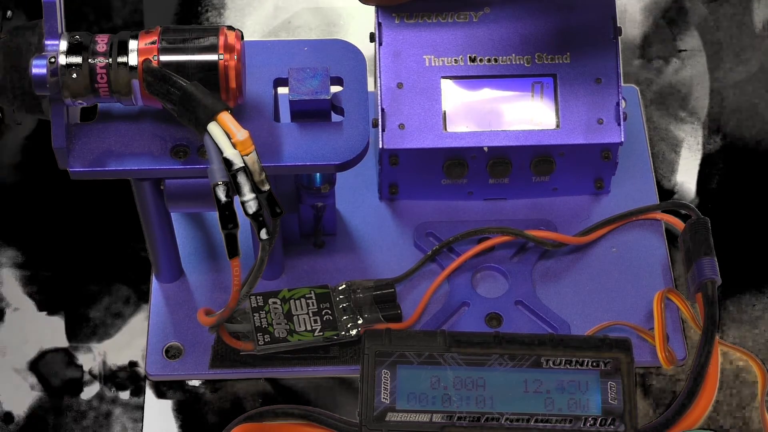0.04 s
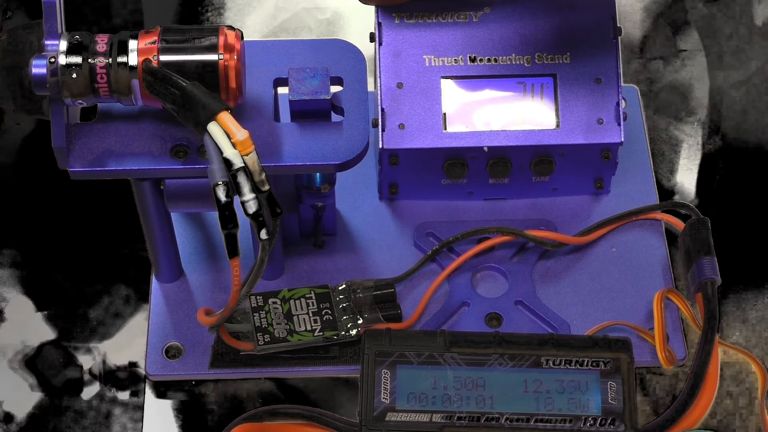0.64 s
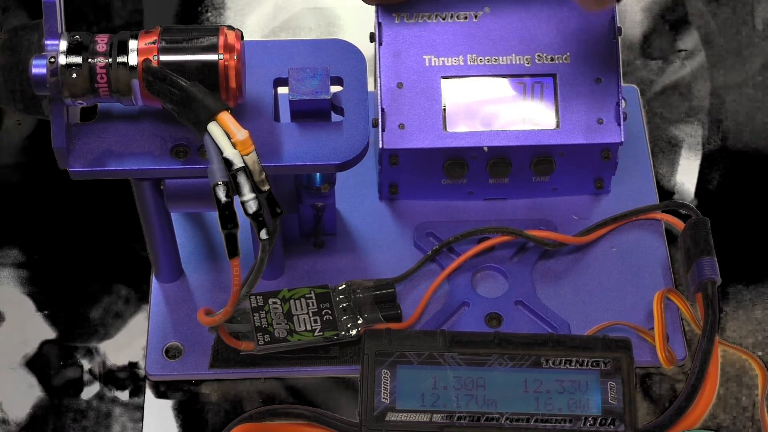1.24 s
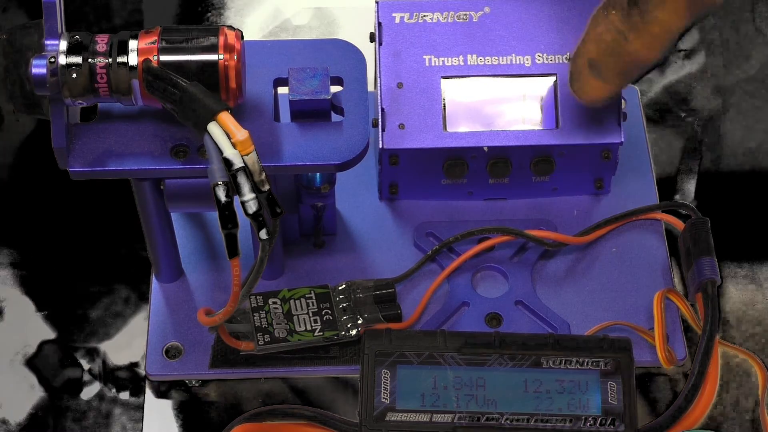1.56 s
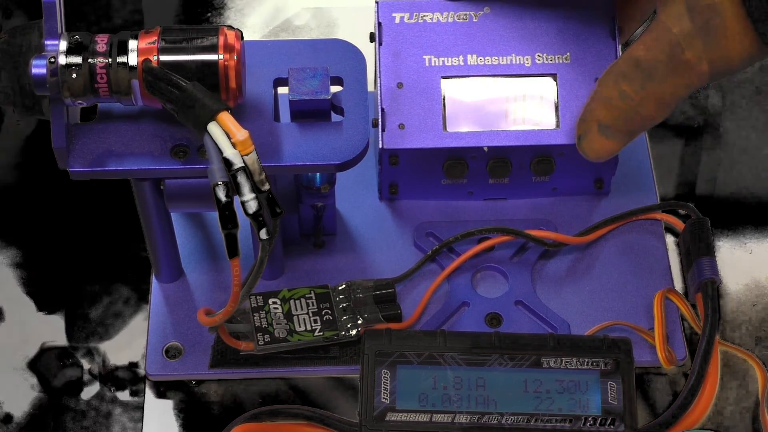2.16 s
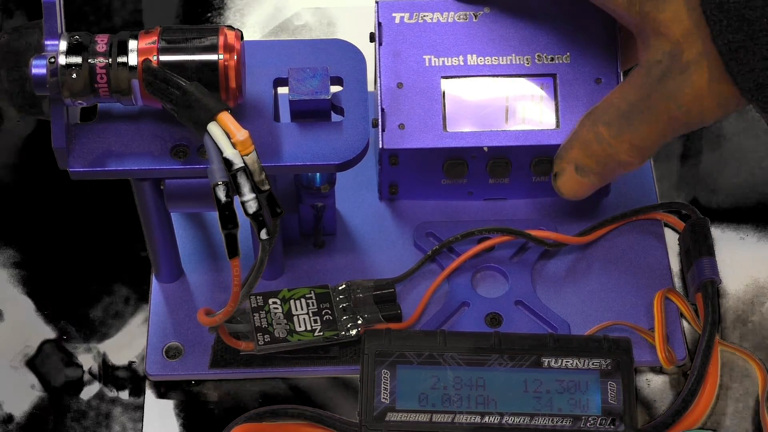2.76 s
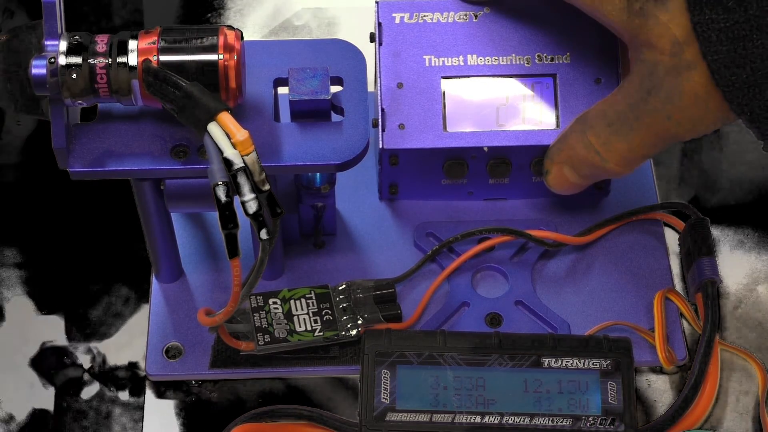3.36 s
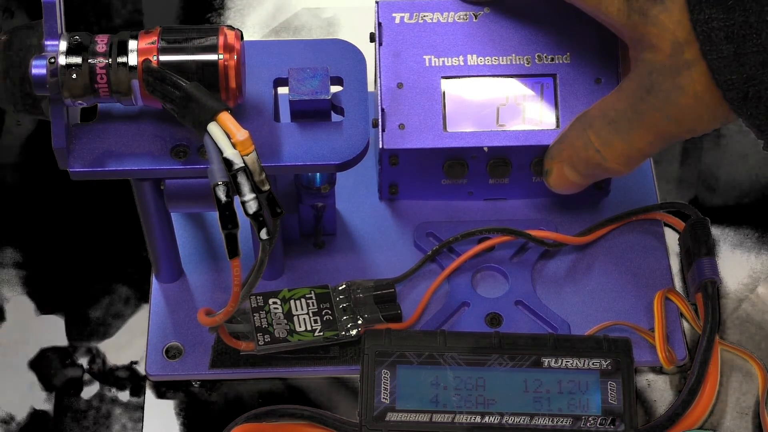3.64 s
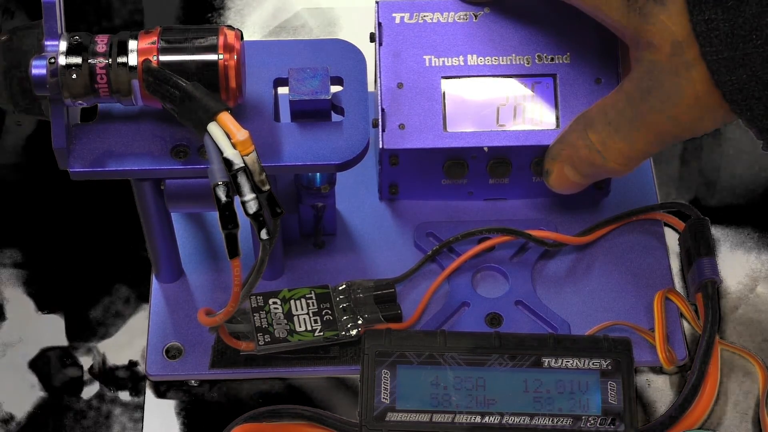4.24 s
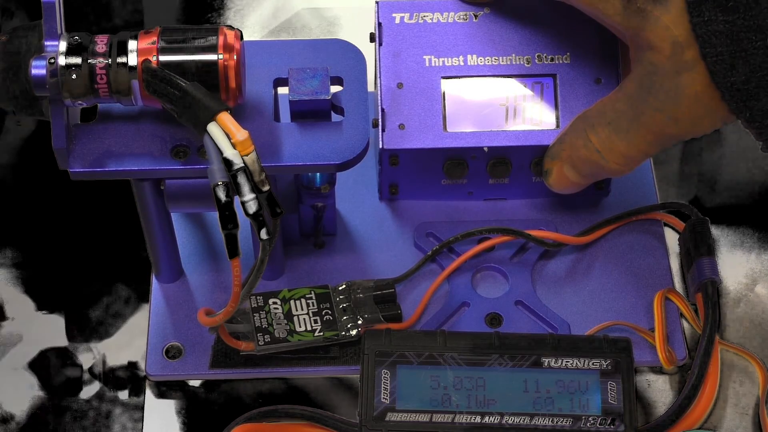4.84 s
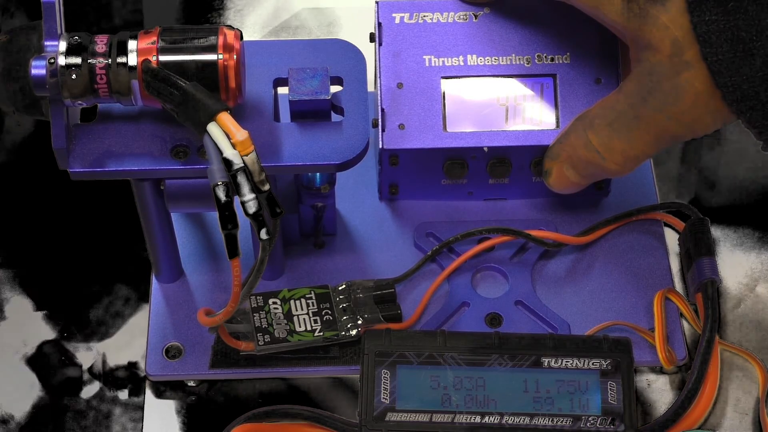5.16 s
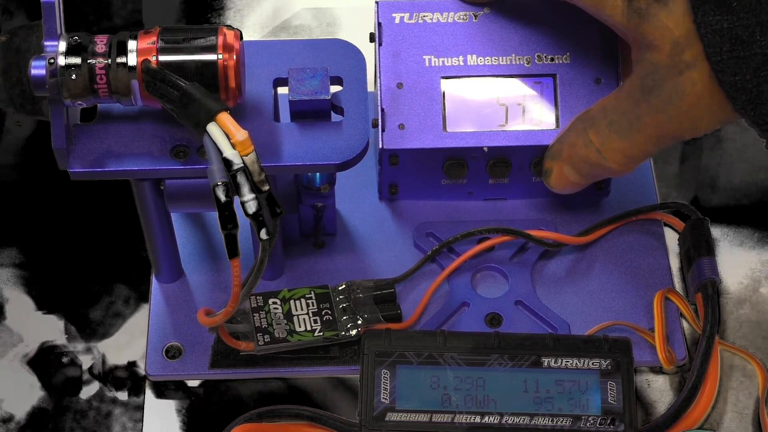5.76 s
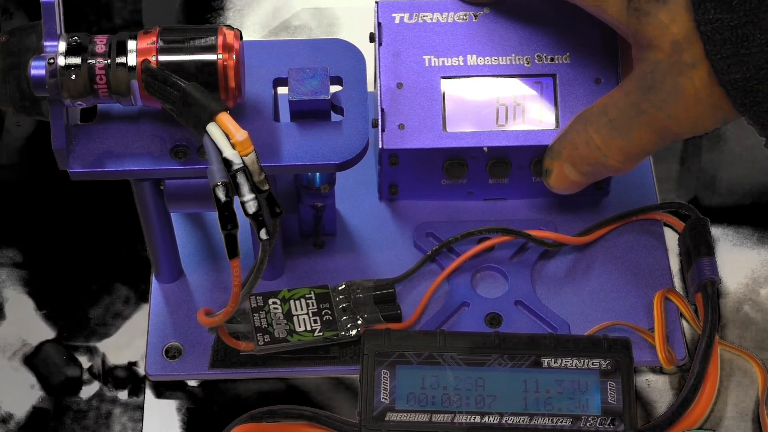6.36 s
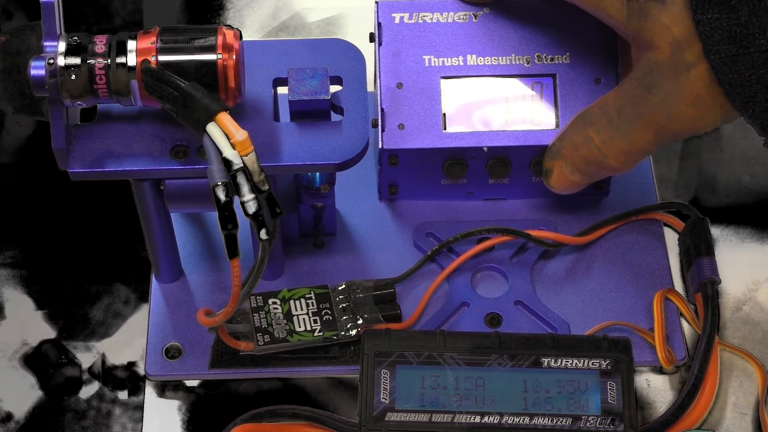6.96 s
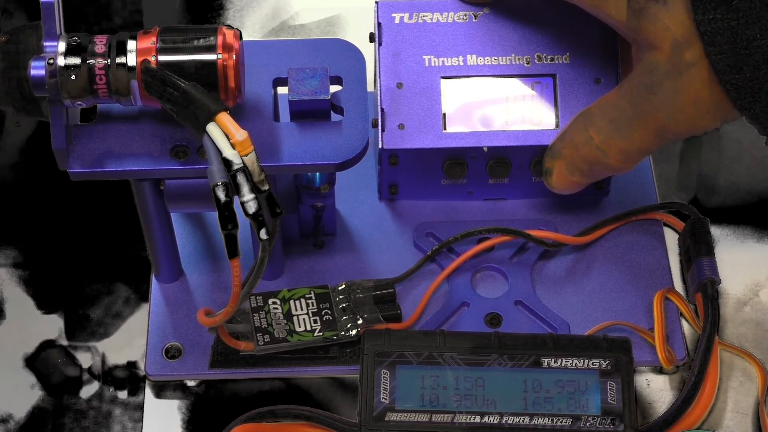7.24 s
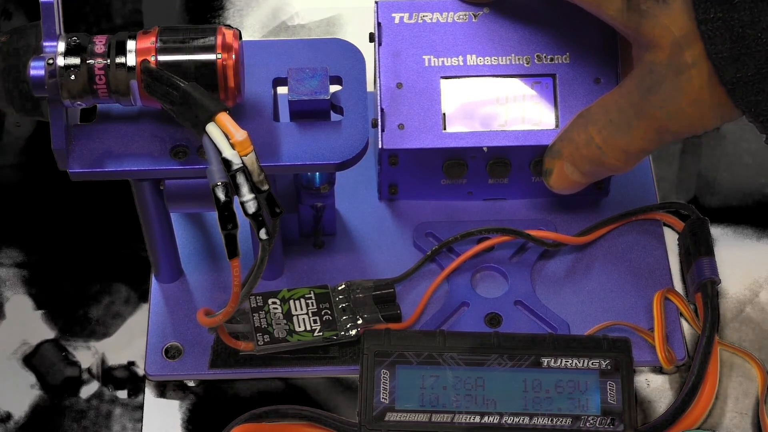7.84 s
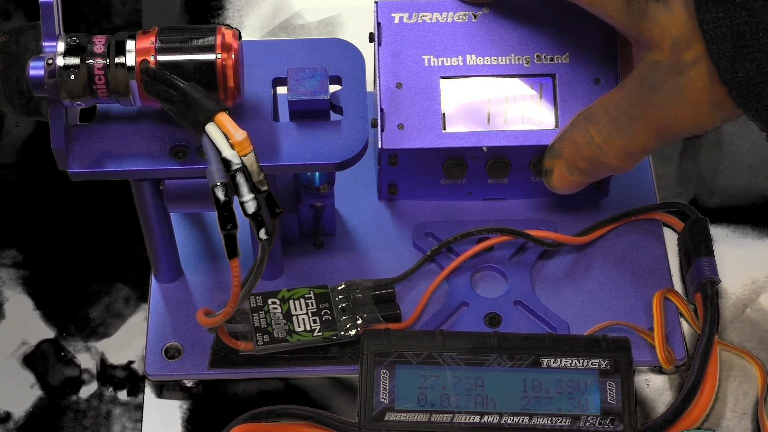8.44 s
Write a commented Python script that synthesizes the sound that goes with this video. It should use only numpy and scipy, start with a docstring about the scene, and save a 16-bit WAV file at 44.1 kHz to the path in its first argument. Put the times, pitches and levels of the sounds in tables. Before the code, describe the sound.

Heard from close by on a workbench, a propeller driven by a small electric motor is throttled up bit by bit. Its low flutter grows into a rising hum beneath the bright whine of meshing gears. Loose teeth rattle at first, and a high controller whine dies away in the second half. Air and bearings hiss throughout, and short gearbox buzzes flare up around the middle and at the finish, with the motor still accelerating.

```python
"""A geared brushless motor swings a two-blade propeller on a metal test stand, close to a stereo microphone.
Throttled up step by step, the blades push the air from a flutter to a hum. The meshing gear teeth sing,
buzz at certain speeds and rattle until load presses them together. The speed controller's switching whine
fades as the throttle opens. Behind it all, air and bearings hiss; the bench throws the gear sound back."""
import sys
import numpy as np
from scipy import signal
from scipy.fft import rfft, irfft, next_fast_len
from scipy.io import wavfile
from scipy.ndimage import uniform_filter1d, map_coordinates

SR = 44100
rng = np.random.default_rng(int(sys.argv[2]) if len(sys.argv) > 2 else 0)


def to_wav(sig):
    """Store sig (one row per channel, or 1-D mono) as 16-bit WAV at the path in sys.argv[1].

    Samples outside -1..1 are clipped; the rate is SR.
    """
    pcm = np.clip(np.atleast_2d(sig), -1, 1) * 32767
    pcm = np.round(pcm).astype(np.int16)
    wavfile.write(sys.argv[1], SR, pcm.T)  # frames by channels


N = 383669
T = np.arange(N) / SR
TEETH, COMMUTATIONS, MOTOR_TURNS = 60, 30, 5  # per turn of the propeller

# the room lifts and cancels the hum at the microphone: f/Hz, level/dB
HUM_COLOUR = [(38, -21), (55, -8.4), (74, -3), (82, -6), (108, 2.1), (120, -2.5), (143, 0.5), (175, -1.25),
              (210, -3.5), (280, -14), (310, -1.7), (345, -10.5), (440, -18.5), (560, -13.5), (680, -14.5),
              (850, -25)]
# spectrum of the chop, the upper blade harmonics: f/Hz, level/dB
CHOP_COLOUR = [(200, -60), (500, -43.5), (720, -45), (870, -57.5), (1200, -52), (1600, -55), (2200, -54.5),
               (3500, -60), (5000, -50.5)]
# the blades bite harder with speed: blade f/Hz, chop level/dB
BITE = [(40, -13.5), (80, -13), (112, -4.5), (150, -1)]
# at top speed the hum leans right: blade f/Hz, left minus right level/dB
LEAN = [(160, 0), (210, -1.3)]


def propeller(turns, blade_hz, grip_hz=50, ease_hz=181):
    """Two blades push the air close by: four strong harmonics, a chop, faint lines of unbalance."""
    def tone(order):
        """A sine of rms 1 at order cycles a turn, shaken a little by eddies."""
        return np.sqrt(2) * np.cos(2 * np.pi * (order * turns + rng.random()) + 0.0049 * order * drift(11))
    # torque strengthens the overtones; they fade when slow blades barely grip the air
    push_db = 0.0818 * spin_up(blade_hz) - 0.5 * np.maximum(grip_hz - blade_hz, 0)
    harmonics_db = (-26.5, -34, -35.5, -38)
    blades = sum(gain_of(db + push_db * (k > 1)) * tone(2 * k) for k, db in enumerate(harmonics_db, 1))
    shaft = gain_of(-46) * tone(MOTOR_TURNS)
    growth_db = 9.5 * doublings(blade_hz) - 0.07 * np.maximum(blade_hz - ease_hz, 0)
    hum = colour((blades + shaft) * gain_of(growth_db), HUM_COLOUR)
    unbalance = sum(gain_of(-58 + 2 * drift(4)) * tone(k) for k in (3, 7, 9))
    chop = sum(gain_of(2 * drift(4)) * tone(2 * k) for k in range(5, 25))
    chop = colour(chop, CHOP_COLOUR) * gain_of(-1 + push_db + lookup(BITE, blade_hz)[0])
    pan_db = lookup(LEAN, blade_hz)[0]
    direct = (hum + unbalance) * gain_of([pan_db / 2, -pan_db / 2])
    # the room hands the hum to the two capsules slightly out of step
    side = gain_of(-31) * signal.hilbert(hum, next_fast_len(N)).imag[:N]
    return direct + np.array([side, -side]) + placed(chop, -0.54)


def tooth_tone(turns, harmonic, lines, spread, fresh):
    """A tooth-rate harmonic; recurring tooth errors throw sidebands about spread cycles a turn wide."""
    angle = np.arange(0, turns[-1], 1 / 128)
    real, imaginary = (repeating(angle, memory=30, fresh=fresh, size=24) for _ in range(2))
    decay = np.exp(-2 * np.pi * spread / 128)
    errors = np.interp(turns, angle, evened(signal.lfilter([1], [1, -decay], real + 1j * imaginary)))
    wheel = np.exp(2j * np.pi * turns)
    clean = sum(height * wheel ** k * np.exp(2j * np.pi * rng.random()) for k, height in enumerate(lines))
    # the sidebands lean a little sharp, more so in each overtone
    envelope = (clean + errors * wheel ** harmonic) / np.sqrt(1 + sum(height ** 2 for height in lines))
    wave = envelope * np.exp(2j * np.pi * harmonic * TEETH * turns)
    below_nyquist = harmonic * TEETH * np.gradient(turns) < 0.5
    return np.sqrt(2) * wave.real * below_nyquist


# the teeth's song before the resonances: blade f/Hz, level/dB of the tooth rate, its double, its triple
SONG = [(40, -51, -52.5, -51), (55, -47.5, -47.5, -52.5), (62.6, -52, -48.5, -59), (84.5, -53, -54, -49.5),
        (95, -46, -47.5, -57), (120, -49, -49.5, -53), (160, -47.5, -59, -53), (196, -49.5, -55, -57)]
# clean lines against the part that tooth errors scatter; under load the song frays:
# blade f/Hz, relative amplitude at the tooth rate, one cycle a turn above it, two above it
CLEAN_LINES = [(39, .1, 0, 0.11), (43, 0.96, 0, 0.58), (54.5, 1.4, .25, 1.4), (66, 2, 0, .2),
               (80, 1.1, 0.41, .1), (90, 0.44, 0.041, .15), (161, 0.25, 1.3, 0.15), (177, .1, 0.57, .3)]
# broad tilt of the song: f/Hz, level/dB
SONG_COLOUR = [(1100, -3), (5000, .5), (9000, 2), (16000, -1)]
# gear train resonances that the tooth tones climb through: f/Hz, width/Hz, level/dB
GEAR_MODES = [(1310, 117, 6.5), (1658, 1200, 17.5), (2235, 275, 13), (2930, 180, 3.5), (3980, 180, 7),
              (4690, 1070, 9), (6230, 250, 10.5), (7110, 720, 12), (9100, 650, 10), (11200, 600, 15),
              (15200, 800, 12)]
# the case's answer to the high gear overtones: f/Hz, level/dB
RING_COLOUR = [(4000, -60), (5400, -47), (6050, -53), (6700, -64.5), (7300, -39), (8200, -59), (9500, -35),
               (10400, -55), (12000, -55), (15000, -49), (17000, -66)]


def gears(turns, blade_hz, wobble=0.17):
    """Meshing teeth sing, harder while speeding up, and pulse once a turn with the off-centre wheel."""
    first_db, second_db, third_db = lookup(SONG, blade_hz)
    lines = np.array(lookup(CLEAN_LINES, blade_hz))
    song = gain_of(first_db) * tooth_tone(turns, 1, lines, spread=2.6, fresh=.12)
    song += gain_of(second_db) * tooth_tone(turns, 2, lines * .5, spread=3, fresh=.3)
    song += gain_of(third_db) * tooth_tone(turns, 3, lines * .5, spread=2.6, fresh=.35)
    push_db, flutter_db = 0.0653 * spin_up(blade_hz), 1.04 * drift(25)
    song = colour(song, SONG_COLOUR, GEAR_MODES) * gain_of(push_db + flutter_db)
    ring = colour(sum(tooth_tone(turns, k, [], spread=7, fresh=.7) for k in (4, 5, 6)), RING_COLOUR)
    return (song + ring) * (1 + wobble * np.cos(2 * np.pi * turns))


# spells of gearbox buzz: t/s, level/dB, rise/s, fall/s, centre/cycles a turn
BUZZES = [(4.6, -33.5, .09, .27, 124), (6.03, -41, .08, .08, 72), (8.65, -30.5, .25, .2, 75)]


def gearbox_buzz(turns, width_hz=1800):
    """Chatter that recurs every turn rings a broad resonance, which climbs with speed, swells and dies."""
    chatter = repeating(turns, memory=40, fresh=0.093, size=360) * (1 + 0.65 * np.cos(4 * np.pi * turns))
    decay = np.exp(-np.pi * width_hz / SR)
    out = np.zeros(N)
    for t, db, rise, fall, order in BUZZES:
        centre = np.exp(2j * np.pi * order * turns)
        ring = (centre * signal.lfilter([1], np.poly([decay, decay]), chatter / centre)).real
        swell = np.exp(-((T - t) / np.where(T < t, rise, fall)) ** 2 / 2)
        out += gain_of(db) * swell * evened(ring)
    return out


# whine lines, lowest first: level/dB, lift when singing/dB, fades above blade f/Hz, fade/dB per Hz
WHINE = [(-49, -4, 62, .2), (-35, -7, 62, .1), (-41, 21, 112, .15), (-62, 19, 110, .3),
         (-37, 15.5, 87, .55), (-51, -3, 56, .3)]
# overtones that swell as they cross a resonance: t/s, pitch/cycles a turn, level/dB, half length/s
SWELLS = [(1.2, 90, -42.5, .45), (3.8, 90, -51, .4), (4.65, 240, -45, .05), (4.66, 210, -50, .05),
          (7.25, 24, -45, .1), (7.42, 46, -44, .15), (7.47, 150, -38, .06), (8.3, 12, -50, .4)]


def controller(turns, blade_hz, switch_hz=11304, warm_s=1.4, sing_hz=81, full_hz=145):
    """Left of centre, the switching whines with sidebands tied to the shaft; overtones swell briefly."""
    switch_cycles = np.cumsum(switch_hz - 15 * np.maximum(T - warm_s, 0)) / SR  # sags once warm
    shaft = turns + 0.2 * drift(60) / (2 * np.pi * COMMUTATIONS)
    singing = np.exp(-abs(blade_hz - sing_hz) / 17)
    offsets = (-30, 0, 30, 40, 60, 90)  # cycles a turn from the switching rate
    whine = 0
    for offset, (db, lift_db, fade_hz, fade_slope) in zip(offsets, WHINE):
        level_db = db + lift_db * singing - fade_slope * np.maximum(blade_hz - fade_hz, 0) + drift(13)
        whine = whine + gain_of(level_db) * np.exp(2j * np.pi * (switch_cycles + offset * shaft))
    whine *= gain_of(-2 * np.maximum(blade_hz - full_hz, 0))  # switching stops near full throttle
    swells = sum(gain_of(db) * np.exp(-((T - t) / half) ** 2 / 2 + 2j * np.pi * order * turns)
                 for t, order, db, half in SWELLS)
    # uneven commutation roughens every line alike
    rough = 1 + gain_of(-15) * (drift(260) + 1j * drift(260))
    return np.sqrt(2) * placed(((whine + swells) * rough).real, 2.5)


# load presses the loose teeth together and quiets them: blade f/Hz, level/dB
RATTLE = [(64, -31.5), (76, -39.5), (150, -41.5), (210, -46.5)]
# spectrum of the rattle: f/Hz, level/dB
RATTLE_COLOUR = [(30, -8), (90, -6), (180, 8.5), (380, -8.5), (680, -10), (850, -10), (1150, -3.5),
                 (2800, -7.5), (4700, 0.5), (5400, -16.5), (6500, -4.5), (8500, -17.5), (11000, -20),
                 (16000, -39)]
# resonances of the stand and gear case: f/Hz, width/Hz, level/dB
CASE_MODES = [(1412, 120, 12.5), (2220, 1150, 15), (3860, 330, 7), (5100, 410, 3.5), (5890, 410, 14)]


def tooth_rattle(turns, blade_hz, knock_db=3):
    """Loose teeth rattle the case unevenly round each turn."""
    knocks = evened(gain_of(knock_db * repeating(turns, memory=13, fresh=0.89, size=16)))
    level = gain_of(lookup(RATTLE, blade_hz)[0])
    return placed(level * knocks * stereo_noise(RATTLE_COLOUR, CASE_MODES), -.1)


# base level shared by air and bearings: t/s, level/dB
HISS = [(0, -38.5), (0.7, -38), (1.6, -35.5), (2.25, -35.5), (2.7, -39.5), (3.05, -41), (3.5, -35),
        (4.1, -35.5), (4.42, -34.5), (4.75, -40), (5.3, -37), (5.9, -37.5), (6.45, -40), (7.55, -39),
        (8.15, -40.5), (8.7, -43.2)]
# spectrum of the rushing air: f/Hz, level/dB
AIR_COLOUR = [(30, -15), (80, -3.5), (200, 7), (400, 2.5), (680, 2), (860, -3.5), (1300, 2), (2400, 1.5),
              (4200, 2), (5600, -0.5), (7200, 0), (8300, -1), (12000, -9), (16000, -2)]
# spectrum of the bearings' fizz: f/Hz, level/dB
FIZZ_COLOUR = [(4000, -13), (8200, -11.5), (8900, -1.5), (9500, 4), (10300, 0), (11700, 4), (12600, 3.5),
               (13400, -1), (14200, -4.5), (16000, -24.5)]


def air_and_bearings(turns, blade_hz, flutter_db=0.84):
    """Behind the tones, air rushes and bearings fizz, both pulsing with each passing blade."""
    base_db = lookup(HISS, T)[0]
    air_db = base_db + 5 + 1.5 * doublings(blade_hz)
    fizz_db = base_db + 4.5 + doublings(blade_hz)
    swish = np.cos(4 * np.pi * turns)
    air = gain_of(air_db + flutter_db * drift(30)) * (1 + 0.24 * swish) * stereo_noise(AIR_COLOUR)
    fizz = gain_of(fizz_db + flutter_db * drift(40)) * (1 + 0.23 * swish) * stereo_noise(FIZZ_COLOUR)
    return placed(air, 0.083) + placed(fizz, 0.33)


# stereo width of the noise: f/Hz, side against mid level/dB
WIDTH = [(40, -5), (200, -10), (500, -5.5), (1000, -5), (2000, -11.5), (4000, -10), (7000, -91),
         (10000, -12), (15000, -7.5)]


def stereo_noise(points, modes=()):
    """Coloured noise with a mid of rms 1, partly unlike in the two channels."""
    mid, side = colour(rng.standard_normal((2, N)), points, modes)
    side = colour(side, WIDTH)
    return np.array([mid + side, mid - side]) / np.std(mid)


def bench(x, echo_db=-15, t60=0.13):
    """Adds quick reflections off the stand and bench, different at each capsule."""
    t = np.arange(4096) / SR
    taps = rng.standard_normal((2, len(t))) * gain_of(-60 * t / t60) * (t > .001)
    taps /= np.linalg.norm(taps, axis=1, keepdims=True)
    return x + gain_of(echo_db) * signal.oaconvolve(x[None], taps, axes=1)[:, :N]


def repeating(turns, memory, fresh, size):
    """Noise of size values a turn that recurs, changing over memory turns; a fresh share never recurs."""
    old, new = rng.standard_normal((2, 1400, size))
    decay = np.exp(-1 / memory)
    old = evened(signal.lfilter([1], [1, -decay], old, axis=0)[-1200:])
    pattern = (np.sqrt(1 - fresh) * old + np.sqrt(fresh) * new[:len(old)]).ravel()
    return evened(map_coordinates(pattern, [turns * size], order=3, mode="wrap"))


def drift(rate):
    """Smooth chance of rms 1 that changes rate times a second."""
    coarse = T[::16]
    wander = map_coordinates(rng.standard_normal(4096), [coarse * rate], mode="wrap")
    return evened(np.interp(T, coarse, wander))


def colour(x, points, modes=()):
    """Filters by a spectrum with resonances on top."""
    size = next_fast_len(N + SR // 4)
    hz = np.fft.rfftfreq(size, 1 / SR)
    point_hz, point_db = np.transpose(points)
    broad_db = np.interp(np.log(hz + 1), np.log(point_hz), point_db)
    peaks_db = sum(db / (1 + (2 * (hz - centre) / width) ** 2) for centre, width, db in modes)
    return irfft(rfft(x, size) * gain_of(broad_db + peaks_db), size)[..., :N]


def lookup(rows, at):
    """A table's later columns, interpolated along its first."""
    axis, *columns = np.transpose(rows)
    return [np.interp(at, axis, column) for column in columns]


def doublings(blade_hz, cruise_hz=100):
    """Octaves of speed above cruising."""
    return np.log2(blade_hz / cruise_hz)


def spin_up(blade_hz):
    """How fast the blade rate climbs, in Hz a second."""
    return uniform_filter1d(np.gradient(blade_hz) * SR, size=SR // 8)


def placed(x, pan_db):
    """Left and right, the left louder by pan_db."""
    return x * gain_of([[pan_db / 2], [-pan_db / 2]])


def gain_of(db):
    """Decibels to amplitude."""
    return 10 ** (np.asarray(db) / 20)


def evened(x):
    """Scales to rms 1."""
    return x / np.sqrt(np.mean(abs(x) ** 2) + 1e-20)


# the throttle steps, as blade passes, two to a turn: t/s, blade f/Hz
BLADE_RATE = [(0.0, 38.71), (0.3, 41.2), (0.43, 43.35), (0.71, 52.32), (1.6, 54.44), (1.78, 57.15),
              (2.07, 68.59), (2.31, 76.08), (2.61, 79.12), (2.76, 79.05), (2.93, 80.3), (3.16, 86.58),
              (3.5, 92.94), (3.83, 96.61), (4.13, 96.2), (4.55, 114.87), (5.2, 129.89), (5.46, 134.69),
              (5.94, 148.86), (6.24, 153.96), (6.83, 160.46), (7.46, 174.93), (7.8, 188.51), (8.21, 199.05),
              (8.7, 208.58)]


def scene():
    """The test stand from close up: one shaft angle and its speed drive every source."""
    blade_hz = lookup(BLADE_RATE, T)[0]
    turns = np.cumsum(blade_hz / 2) / SR
    gearbox = bench(gears(turns, blade_hz) + gearbox_buzz(turns))
    return (propeller(turns, blade_hz) + gearbox + controller(turns, blade_hz)
            + tooth_rattle(turns, blade_hz) + air_and_bearings(turns, blade_hz))


def record(dry):
    """The recorder's band limit."""
    lowpass = signal.firwin(511, 15750, window=("kaiser", 9), fs=SR)
    return signal.oaconvolve(dry, lowpass[None], "same")


dry = scene()
out = record(dry)
to_wav(out)
```